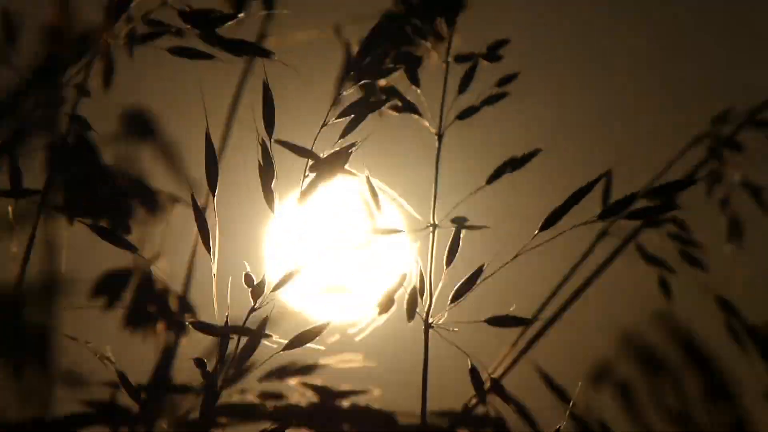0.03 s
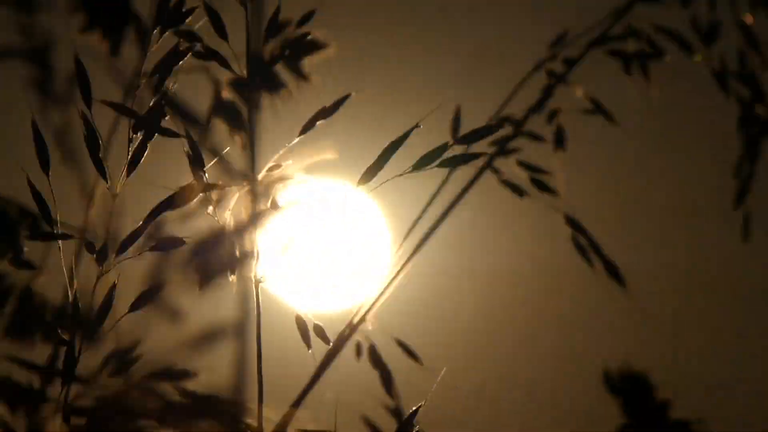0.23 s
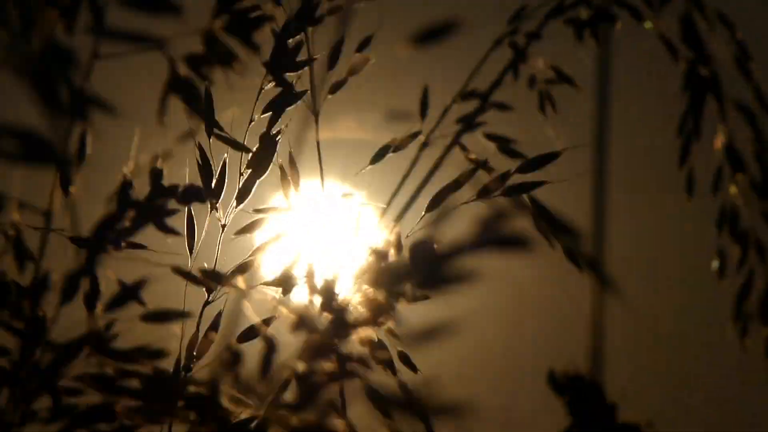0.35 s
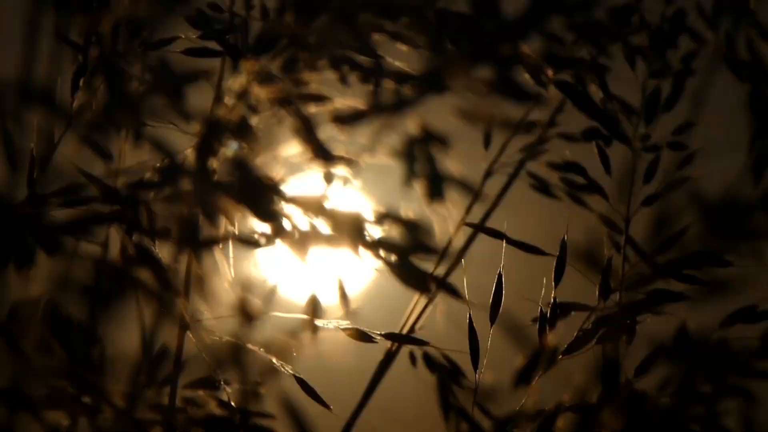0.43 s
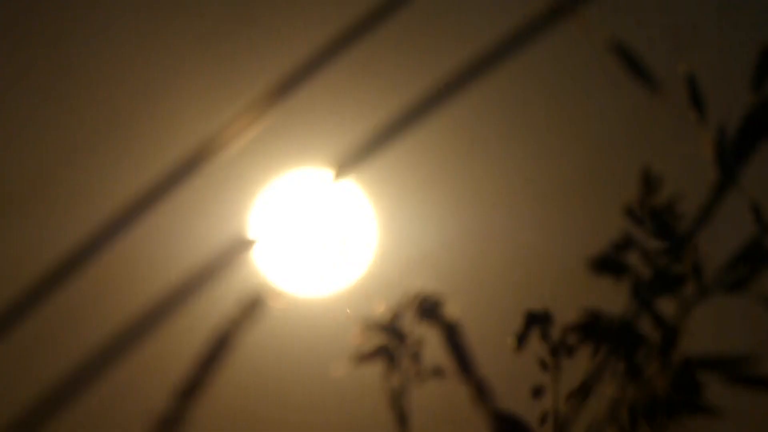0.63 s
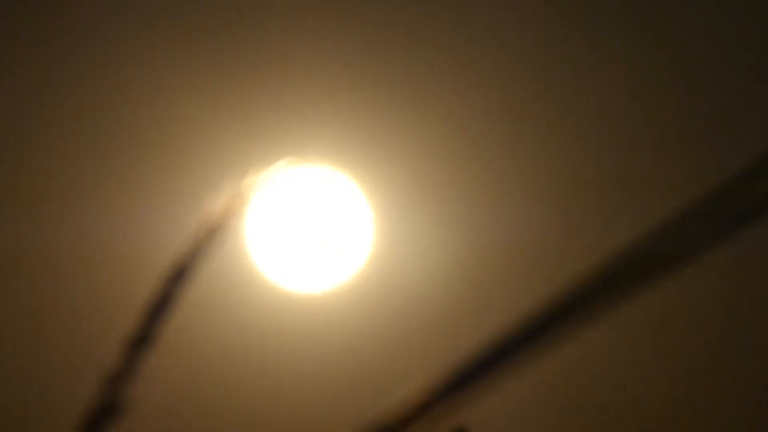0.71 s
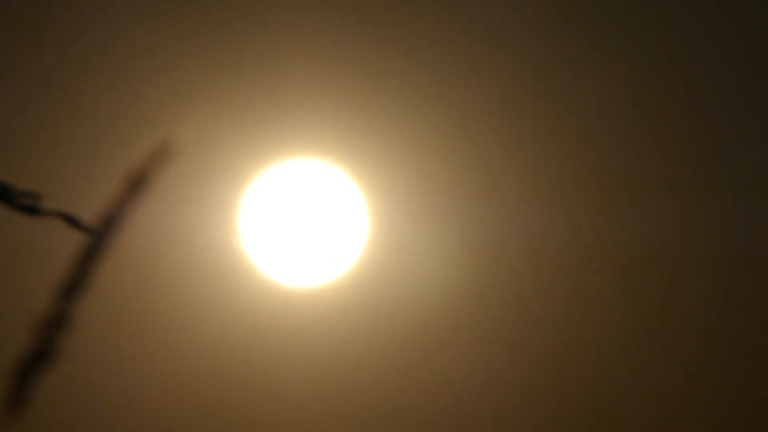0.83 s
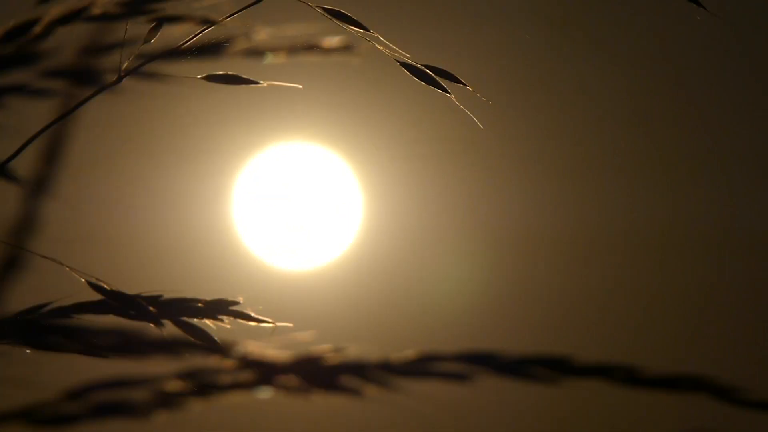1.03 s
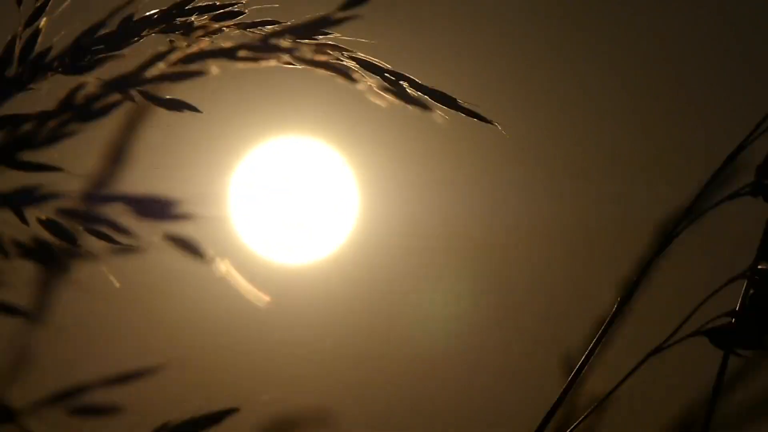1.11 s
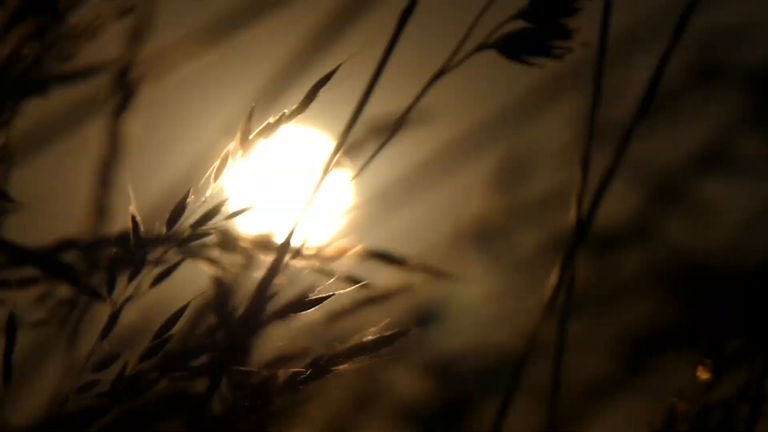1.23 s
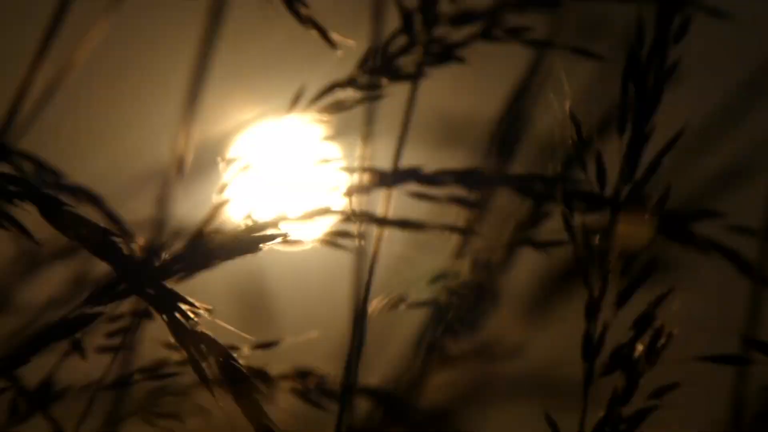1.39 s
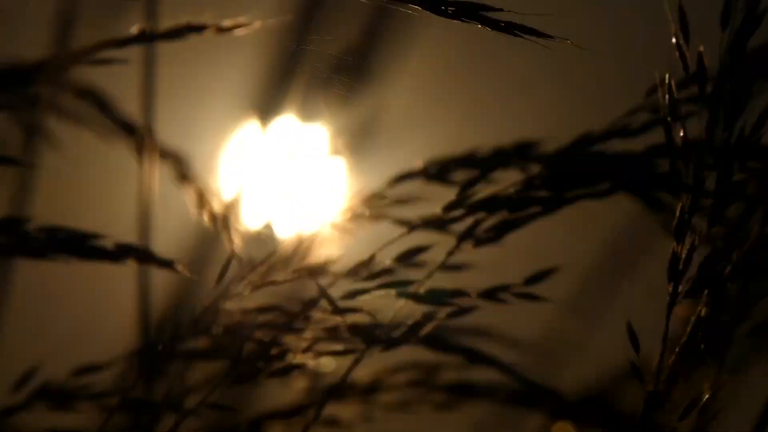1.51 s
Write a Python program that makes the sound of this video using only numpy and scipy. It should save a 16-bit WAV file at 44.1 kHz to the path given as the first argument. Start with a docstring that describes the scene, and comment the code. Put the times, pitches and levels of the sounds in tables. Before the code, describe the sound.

Gusty wind rumbles and thumps in a grassy meadow while small birds twitter and crickets trill.

```python
"""A meadow at sunset. Gusts buffet the two microphone ports: turbulent pressure rumbles and single
eddies thump. Tall grass hisses by friction, ever brighter, over the soft rush of distant wind.
Crickets trill near 4.7 kHz by stridulation, a small bird whistles some way off to the left, and
farther birds twitter, their calls scattered by the ground and trees."""
import sys
import numpy as np
from scipy import signal
from scipy.fft import rfft, irfft
from scipy.io import wavfile
from scipy.ndimage import uniform_filter1d

SR = 44100
rng = np.random.default_rng(int(sys.argv[2]) if len(sys.argv) > 2 else 0)


def store_pcm(level_fs):
    """Save levels as 16-bit WAV."""
    pcm = np.round(np.clip(level_fs, -1, 1) * 32767).astype(np.int16)
    wavfile.write(sys.argv[1], SR, np.atleast_2d(pcm).T)


N = 68355
T = np.arange(N) / SR
LEFT_RIGHT = np.array([[1], [-1]])

# Levels in the tables are relative; pan is left minus right.
# spectrum of the distant wind: f/Hz, level/dB
RUSH_SPECTRUM = [(30,2),(100,3.5),(230,0),(450,1),(750,2),(1100,0),(1600,-9.5),(2500,-14.5),(5000,-45),(12000,-59)]
# bouts of far birdsong: t/s, duration/s, centre f/Hz, level/dB
TWITTER_BOUTS = [(0,.06,4840,-51.5),(0.201,.17,2760,-53.5),(0.243,.17,5300,-53.5),(0.293,.07,3580,-51.5),(.86,.16,3350,-60),(1.124,.17,3626,-51),(1.263,.17,5130,-47.5),(1.4,.1,3080,-52)]
# spectrum of the far crickets: f/Hz, level/dB
CHORUS_SPECTRUM = [(2000,-12),(3000,-7),(4100,-12.5),(4650,3),(5050,-3.5),(5600,-24),(7000,-44)]
# trills of near crickets: t/s, duration/s, stroke period/s, level/dB, pan/dB
CRICKET_TRILLS = [(0.018,.27,0.035,-48,3),(.455,.15,0.039,-50,-1),(0.587,.1,0.037,-53,17),(0.75,.09,0.038,-47,8),(0.817,.13,0.035,-48,-19),(0.926,.15,0.03,-54.5,29),(1.191,.13,.036,-43.5,0),(1.322,.12,0.032,-44,10),(1.473,.08,.052,-45.5,8)]
# whistles: t/s, duration/s, first f/Hz, turning f/Hz, last f/Hz, fraction before the turn, level/dB
BIRD_NOTES = [(0.018,0.041,3694,4000,3280,0.57,-44),(0.063,.021,4820,4460,3650,0.48,-48),(0.09,0.0098,3540,3640,3570,0.57,-42),
              (0.123,0.008,3250,3710,3850,.65,-38),(0.131,0.012,3900,4040,4600,0.51,-33.5),(0.136,0.012,4500,4310,3120,0.21,-44),(0.155,.028,2684,2730,2670,0.56,-47),(0.24,.02,2830,2740,2560,0.38,-48),
              (0.316,.008,3200,4340,4900,.5,-43),(0.316,0.0156,4900,5170,5000,.4,-42),(0.378,0.02,3930,4710,4800,0.64,-40),(0.399,0.025,4100,3560,3350,0.48,-44),(0.424,0.023,4430,4550,3650,.55,-40),
              (0.447,0.019,3580,4040,4150,0.82,-44),(0.475,0.022,3200,3590,3170,0.58,-42),(0.507,0.029,2920,2790,2880,0.56,-53.5),
              (.705,.012,3520,3870,4540,.5,-40),(.706,0.03,4450,4650,4370,.5,-42.5),(0.729,0.03,3800,3500,2720,0.48,-43),(0.758,0.019,3630,4040,4150,0.83,-43.5),(0.783,0.029,2917,3060,2600,0.83,-42),
              (0.935,0.015,3280,3360,4460,0.32,-47.5),(0.965,0.026,4656,4650,3770,0.49,-40),(1.005,0.019,4740,4654,4470,.5,-36),(1.026,0.015,3580,3395,3330,0.54,-43),
              (1.043,0.023,3730,3950,2886,0.65,-36.5),(1.073,0.0122,2990,3890,4200,0.66,-43),(1.082,.023,4340,4574,4260,0.41,-31),(1.082,0.026,3410,3270,3250,.5,-43),(1.107,0.013,3510,4270,3920,0.61,-32),(1.135,0.032,3290,3810,3250,0.43,-43),
              (1.285,0.019,5690,5390,5270,0.47,-48),(1.343,0.0318,3416,3394,3040,0.54,-36.5),(1.37,0.0086,3040,2805,2700,.5,-44),(1.403,0.026,3480,4370,3500,0.81,-41)]
# envelope of the grass hiss: t/s, blade level/dB, treble level/dB
GRASS_ENVELOPE = [(0,-49.5,-69),(.185,-51,-61.5),(.212,-47.5,-57),(.24,-49,-60),(.4,-52.5,-59),(.5,-56,-63.5),(.6,-54,-57.5),(.7,-49.5,-54.5),(.78,-50.5,-57.5),(.9,-50,-56),(1.1,-48.5,-53),(1.25,-50,-52.5),(1.4,-49,-50.5),(1.55,-50,-49.5)]
# spectrum of the brushing blades: f/Hz, level/dB
BLADE_SPECTRUM = [(300,-8),(1200,-1),(2200,2),(4000,3),(6500,-0.5),(9000,-6),(12000,-9),(16000,-15)]
# spectrum of the fine treble of the grass: f/Hz, level/dB
TREBLE_SPECTRUM = [(2000,-25),(5000,-9.5),(8000,-3),(10500,-1.5),(12500,-1),(14000,-4.5),(16000,-11.5)]
# strength of the wind at the ports: t/s, level/dB
GUST_ENVELOPE = [(0,-64),(.14,-62),(.19,-42),(.218,-28.5),(.245,-29),(.275,-32),(.316,-31),(.336,-46),(.354,-46),(.378,-27),(.41,-26.5),(.44,-25),(.462,-29.5),(.49,-27),(.545,-34),(.574,-45),(.626,-39.5),(.648,-32),(.70,-43),(.73,-52),(.776,-40),(.835,-48.5),(.866,-41),(.90,-40),(.94,-35.5),(.98,-38.5),(1.02,-40),(1.056,-50.5),(1.23,-45),(1.55,-57)]
# spectrum of the port pressure in a light breeze: f/Hz, level/dB
BREEZE_SPECTRUM = [(20,-18),(35,-24),(55,-6),(90,-5),(150,-9),(250,-23),(400,-35),(800,-43),(2000,-91)]
# spectrum of the port pressure in a full gust: f/Hz, level/dB
BUFFET_SPECTRUM = [(20,-21),(40,-14),(70,-10),(120,-2.5),(170,1),(260,-5.5),(400,-14),(650,-28),(1200,-35.5),(3000,-57)]
# spectrum of an eddy breaking up: f/Hz, level/dB
BREAKUP_SPECTRUM = [(150,-14),(400,-7),(700,-2),(1100,-19),(2000,-25),(4000,-53)]
# eddies striking the ports: t/s, width/s, level/dB, pan/dB
PORT_EDDIES = [(.164,0.0031,-37,8),(.224,0.0012,-19,-4),(.31,.0016,-16.5,7.5),(.391,0.0013,-17,-13),(0.432,0.0024,-21.5,-16),(.438,0.00089,-15,14),(.442,0.00072,-18,-0.5),(0.474,0.0011,-20.5,11.5),(0.484,0.00073,-14.5,-8.5),(.54,0.0016,-27,17),(0.651,0.0021,-26,-1),(0.866,0.0033,-28.5,0),(0.88,0.0037,-30.5,0),(0.92,0.0033,-31.5,-9),(.945,0.00094,-25.5,-5),(.979,0.0018,-29,-24),(1.071,.0035,-39,-13)]


def undb(db):
    """Amplitude ratio of a level in decibels."""
    return 10 ** (np.asarray(db) / 20)


def curve(rows, column=1):
    """Linear interpolation in time through one column of a table."""
    rows = np.array(rows)
    return np.interp(T, rows[:, 0], rows[:, column])


def colour(x, spectrum):
    """Spectral shaping, normalised to unit rms."""
    hz, db = np.array(spectrum).T
    gain = undb(np.interp(np.log(np.fft.rfftfreq(N, 1 / SR) + 1), np.log(hz), db))
    y = irfft(rfft(x) * gain, N)
    return y / np.std(y)


def noise(spectrum):
    """Coloured noise, uncorrelated between left and right."""
    return colour(rng.standard_normal((2, N)), spectrum)


def flicker(rate_hz):
    """Two random fluctuations of unit variance, smoothed over 1 / rate_hz."""
    width = int(SR / rate_hz)
    y = uniform_filter1d(rng.standard_normal((2, N)), width, mode="wrap")
    y = uniform_filter1d(y, width, mode="wrap")
    return y / np.std(y)


def tone(hz):
    """A sinusoid whose phase is the integral of its frequency."""
    return np.sin(2 * np.pi * np.cumsum(hz) / SR)


def delay(x, lag_s):
    """Propagation delay of a longer path."""
    return np.interp(T - lag_s, T, x)


def add(out, start, x, pan_db):
    """Mix in a sound at a time; a level difference sets its direction."""
    i = max(int(start * SR), 0)
    x = x[:max(N - i, 0)]
    out[:, i:i + len(x)] += x * undb(LEFT_RIGHT * pan_db / 2)


def reflections(x, decay):
    """Diffuse scattering: convolution with decaying noise of unit energy."""
    response = rng.standard_normal((2, len(decay))) * decay
    response /= np.sqrt(np.sum(response ** 2, axis=1, keepdims=True))
    return signal.fftconvolve(x, response, axes=1)[:, :N]


def field_echo(x, echo_db, t60_s=0.26):
    """Direct sound plus reverberation from the ground and far trees."""
    return x + undb(echo_db) * reflections(x.mean(axis=0)[None], undb(-60 * T / t60_s))


def stem_scatter(x, decay_s=0.012):
    """Early reflections from nearby stems interfere with a note and roughen it."""
    t = T[:int(5 * decay_s * SR)]
    return x + undb(-5) * reflections(x, np.exp(-t / decay_s))


def distant_rush():
    """Flow noise of far wind follows the level of the blades and reaches the left port first."""
    mid, side = noise(RUSH_SPECTRUM)
    blade_db = curve(GRASS_ENVELOPE)
    out = np.array([mid, delay(mid, lag_s=68e-6)]) + undb(-12) * side * LEFT_RIGHT
    return out * undb(-49.5 + blade_db - blade_db.mean() + 0.76 * flicker(24))


def far_birds(chirp_s=0.0093, chirps_per_s=93):
    """Reverberation blurs tiny random glides into a distant twitter."""
    out = np.zeros((2, N))
    u = T[:int(chirp_s * SR)] / chirp_s
    for at, length, centre_hz, db in TWITTER_BOUTS:
        for start in np.arange(at, at + length, 1 / chirps_per_s):
            pitch, glide, late = rng.standard_normal(3)
            hz = centre_hz * (1 + 0.0767 * pitch + 0.11 * glide * (u - .5))
            add(out, start + .004 * late, tone(hz) * np.sin(np.pi * u) * undb(db), pan_db=5.5)
    return field_echo(out, echo_db=1)


def crickets(wing_hz=4757, sag_hz=297, stroke_s=0.0262):
    """Stridulation: each stroke is a tone that sags as the wing slows; far crickets merge into a band."""
    out = np.zeros((2, N))
    u = T[:int(stroke_s * SR)] / stroke_s
    for at, length, period, db, pan_db in CRICKET_TRILLS:
        for start in np.arange(at, at + length - stroke_s / 2, period):
            pitch, force = rng.standard_normal(2)
            hz = wing_hz * (1 + .006 * pitch) - sag_hz * u ** 1.91
            add(out, start, tone(hz) * np.sin(np.pi * u) * undb(db + 0.5 + 0.48 * force), pan_db)
    out[1] = delay(out[1], lag_s=50e-6)
    near = field_echo(out, echo_db=-7)
    chorus = noise(CHORUS_SPECTRUM) * undb(-51 + 1.8 * flicker(48))
    return near + chorus


def small_bird(edge_s=0.005):
    """Frequency modulation: each whistle glides to a turning pitch and away, reaching the left first."""
    out = np.zeros((2, N))
    waver, flutter = flicker(440)[0], flicker(300)[0]
    for at, length, first_hz, turn_hz, last_hz, share, db in BIRD_NOTES:
        t = T[:int(length * SR)]
        here = slice(int(at * SR), int(at * SR) + len(t))
        turn = share * length
        approach = (first_hz - turn_hz) * (1 - t / turn) ** 2
        departure = (last_hz - turn_hz) * ((t - turn) / (length - turn)) ** 2
        hz = (turn_hz + np.where(t < turn, approach, departure)) * (1 + 0.012 * waver[here])
        swell = np.sin(np.pi / 2 * np.clip(np.minimum(t, length - t) / edge_s, 0, 1))
        add(out, at, tone(hz) * swell * undb(db - 3.5 + 1.18 * flutter[here]), pan_db=12)
    out[1] = delay(out[1], lag_s=70e-6)
    return field_echo(stem_scatter(out), echo_db=-2.5)


def hiss(spectrum):
    """Wide friction noise, sprinkled with the tiny impacts of husks."""
    mid, side = noise(spectrum)
    friction = (mid + undb(0.8) * side * LEFT_RIGHT) / np.sqrt(2)
    husks = rng.standard_normal((2, N)) * (rng.random((2, N)) < .02)
    return friction + undb(-11) * colour(husks, spectrum)


def grass():
    """Friction between blades; the fine treble grows as the breeze spreads through the field."""
    blades = hiss(BLADE_SPECTRUM) * undb(curve(GRASS_ENVELOPE) - 0.5 + flicker(25))
    treble = hiss(TREBLE_SPECTRUM) * undb(curve(GRASS_ENVELOPE, column=2) + 1 + flicker(25))
    return blades + treble


def buffeting(reference_db=-32):
    """Turbulent pressure on each port: a stronger gust is both louder and brighter."""
    gust_db = curve(GUST_ENVELOPE) - reference_db
    breeze = noise(BREEZE_SPECTRUM) * undb(-35.5 + 0.77 * gust_db)
    buffet = noise(BUFFET_SPECTRUM) * undb(-33 + 1.35 * gust_db + 3 * flicker(72))
    return breeze + buffet


def eddies(crossing_s=0.0012, breakup_s=0.005, tight_s=0.001):
    """Convection carries the low-pressure core of each vortex over the left port, then the right."""
    out = np.zeros((2, N))
    turbulence = noise(BREAKUP_SPECTRUM) * undb(-25)
    for at, width, db, pan_db in PORT_EDDIES:
        t = np.array([T - at, T - at - crossing_s])
        suction = ((t / width) ** 2 - 1) * np.exp(-(t / width) ** 2 / 2)
        # the tightest eddies break up into the most fine turbulence
        puff = turbulence * np.exp(-(t / breakup_s) ** 2 / 2) * tight_s / width
        out += (suction + puff) * undb(db + LEFT_RIGHT * pan_db / 2)
    return out


def scene():
    """Superposition of all sources at the two ports."""
    return buffeting() + eddies() + grass() + distant_rush() + small_bird() + far_birds() + crickets()


def record(dry):
    """Band limiting: a steep low-pass filter cuts the treble above 15.8 kHz."""
    return signal.sosfilt(signal.ellip(10, .2, 80, 15800, fs=SR, output="sos"), dry)


dry = scene()
out = record(dry)
store_pcm(out)
```